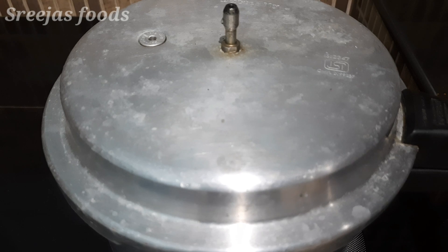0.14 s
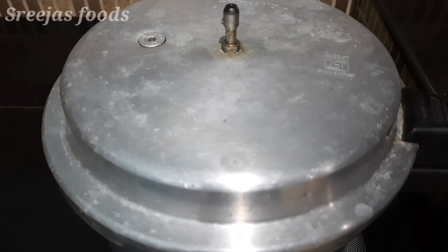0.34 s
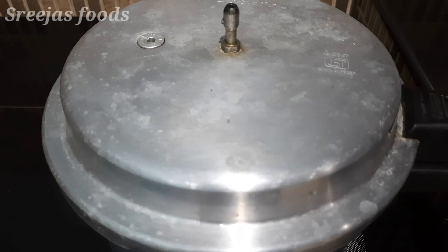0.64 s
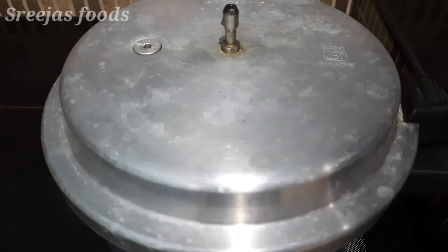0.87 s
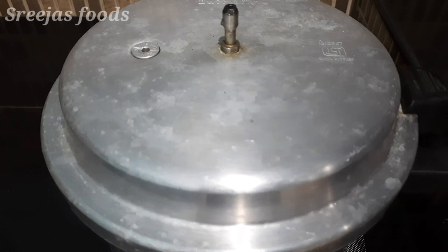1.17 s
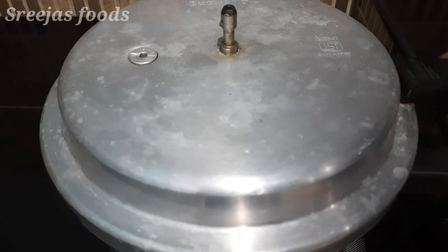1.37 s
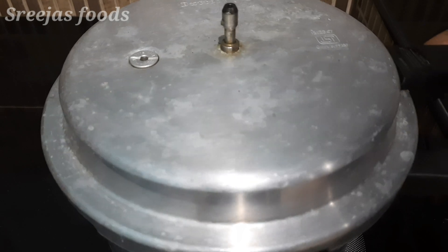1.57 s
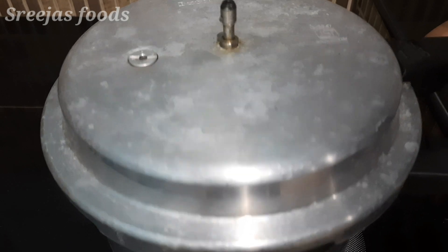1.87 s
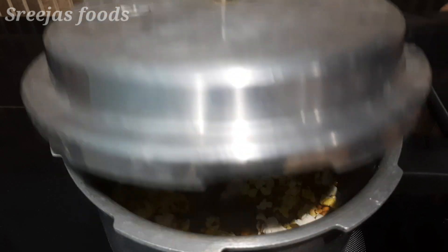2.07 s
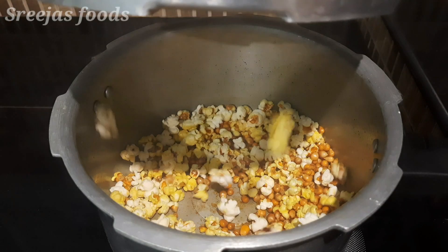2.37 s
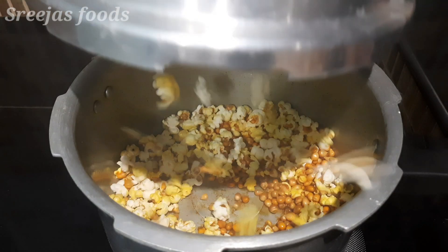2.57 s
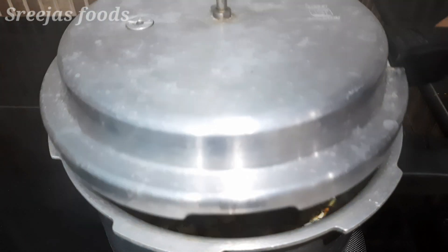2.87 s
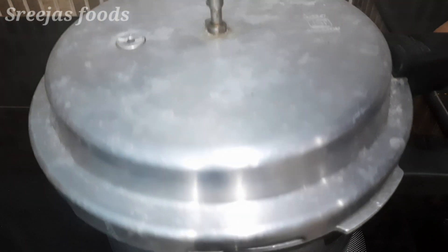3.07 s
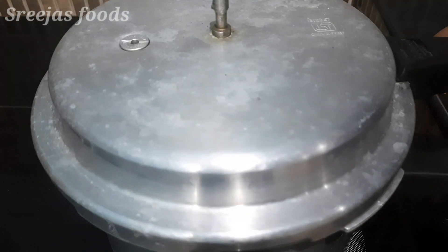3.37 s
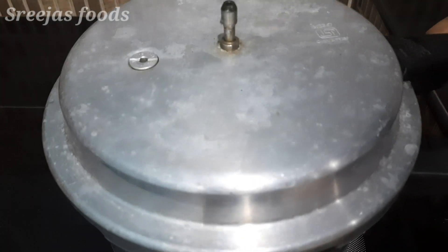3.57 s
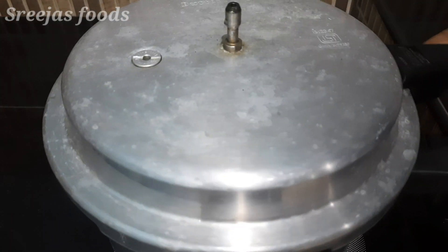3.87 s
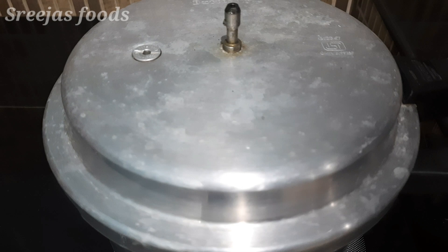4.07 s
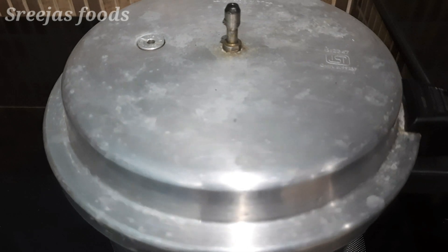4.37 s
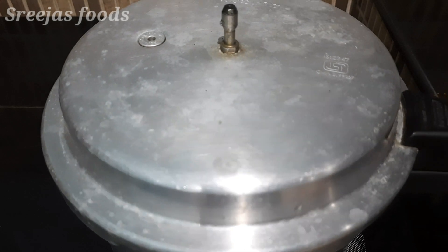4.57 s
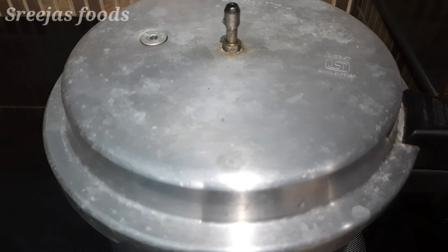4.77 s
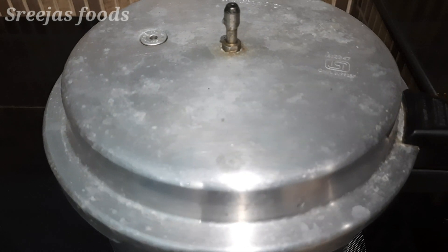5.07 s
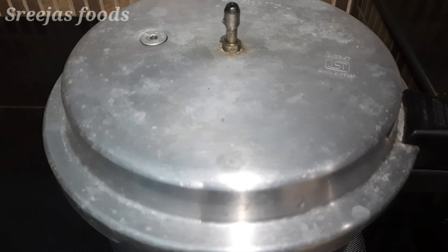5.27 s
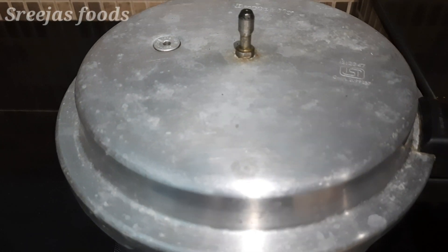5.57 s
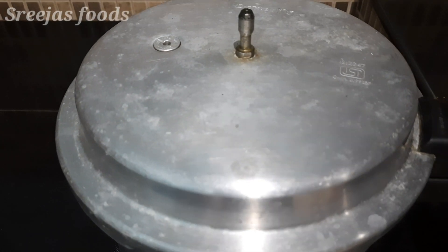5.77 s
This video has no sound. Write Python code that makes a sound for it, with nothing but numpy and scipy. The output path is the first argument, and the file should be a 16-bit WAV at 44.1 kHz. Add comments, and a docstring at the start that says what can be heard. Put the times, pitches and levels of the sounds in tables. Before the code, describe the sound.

Corn kernels pop unevenly inside a lidded aluminium pressure cooker, tapping the metal over a faint oil sizzle and low stove rumble. The lid is lifted and a few pops crack out louder and brighter. It drops back with a clatter of knocks and a heavy thump, then scrapes and clinks as it is turned shut while scattered pops continue. The microphone is close, in a small, hard-walled kitchen.

```python
"""Corn pops in a thick aluminium cooker on a stove; a hand lifts the lid, drops it back and turns it shut.
Each pop or knock is a short noisy blow that drums the lid, cracks in the air and may ring the rim.
The lid drags over its lugs and the vent pipe ticks once; underneath, oil sizzles and the stove rumbles.
Heard in a small, hard kitchen, on a close phone microphone that overloads on the loudest blows.
"""
import sys
import numpy as np
from scipy import signal
from scipy.fft import rfft, irfft
from scipy.io import wavfile

SR = 44100
rng = np.random.default_rng(int(sys.argv[2]) if len(sys.argv) > 2 else 0)


def output_pcm(signal):
    """Save a mono or channel-first signal as 16-bit PCM at the path in sys.argv[1].

    Samples are clipped to [-1, 1] before scaling.
    """
    pcm = np.clip(np.atleast_2d(signal).T, -1, 1) * 32767
    wavfile.write(sys.argv[1], SR, np.round(pcm).astype(np.int16))


N = 261264

# heavy blows that jolt pot and stove: (time [s], thud [dB], stove shake [dB])
JOLTS = [(0.139, -63, -62), (1.29, -71, -70), (1.581, -49, -49.5), (2.021, -33.5, -64.5),
         (2.195, -30.5, -47.5), (2.558, -23.5, -42.5), (2.998, -26, -39.5), (3.2111, -15, -47),
         (3.256, -17, -42), (3.305, -12, -53.5), (3.4417, -31.5, -64), (3.5555, -24.5, -60),
         (3.642, -19, -34.5), (3.6666, -2.1, -38), (3.861, -28.5, -58), (4.0783, -43, -38.5),
         (4.618, -35, -53), (4.862, -55, -53), (5.303, -52, -55)]
LID_LIFTS_S, LID_LANDS_S = 2.15, 3.02
TIME = np.arange(N) / SR


def from_db(db):
    return 10 ** (np.asarray(db) / 20)


def rms_one(x):
    return x / np.sqrt(np.mean(x ** 2) + 1e-20)


def at_hz(points, hz):
    point_hz, values = np.transpose(points)
    return np.interp(np.log(hz), np.log(point_hz), values)


def band(x, low_hz, high_hz):
    return signal.sosfilt(signal.butter(4, [low_hz, high_hz], "band", fs=SR, output="sos"), x + 1e-18)


def coloured(x, spectrum):
    """Filters x by a curve of (frequency [Hz], gain [dB])."""
    hz = np.maximum(np.fft.rfftfreq(N, 1 / SR), 10)
    return irfft(rfft(x) * from_db(at_hz(spectrum, hz)), N)


def resonance(x, hz, width_hz):
    """One damped mode driven by x."""
    r = np.exp(-np.pi * width_hz / SR)
    gain = (1 - r * r) / 2
    return signal.lfilter([gain, 0, -gain], [1, -2 * r * np.cos(2 * np.pi * hz / SR), r * r], x)


def struck_mode(start_s, hz, db, t60, rise_ms):
    """One decaying sine: returns its start sample and its sound."""
    at = round(start_s * SR)
    t = np.arange(min(round(1.5 * t60 * SR), N - at)) / SR
    return at, from_db(db - 60 * t / t60) * np.minimum(1000 * t / rise_ms, 1) * np.sin(2 * np.pi * hz * t)


def stove(rumble_db=-65, rise_s=0.04, t60=0.35):
    """A steady low rumble; each jolt sets stove and counter shaking, then it dies away."""
    level = from_db(rumble_db)
    for start_s, _, shake_db in JOLTS:
        t = np.maximum(TIME - start_s, 0)
        fall_db = 60 * np.maximum(t - rise_s, 0) / t60
        level = level + from_db(shake_db - fall_db) * np.minimum(t / rise_s, 1)
    return level * rms_one(band(rng.standard_normal(N), 42, 112))


def frying(spits_per_s=5400):
    """Dense tiny oil bursts above; below, a dull low murmur that swells around the knocks."""
    # hiss and murmur swell and sink: (time [s], sizzle [dB], murmur [dB], treble against sizzle [dB])
    levels = [(0, -60, -68, 8), (.2, -51, -61, 6), (.42, -42, -59, -5), (.62, -52.5, -63.5, 10),
              (.86, -50.5, -54, 4.5), (1.36, -60.5, -65.5, 15), (1.44, -58.5, -51, 5.5),
              (1.56, -60.5, -62, -1), (1.64, -47.5, -44.5, -2), (1.9, -41, -55, -11),
              (2.16, -61.5, -66, 10.5), (2.54, -56, -72, 8), (2.74, -32, -56, 0), (2.97, -49.5, -60.5, 3),
              (3.2, -38, -30, 2), (3.75, -47, -41.5, 1), (4.02, -54, -57, -13), (4.29, -54, -45.5, 2),
              (4.58, -59.5, -55.5, 3.5), (4.92, -54, -52.5, 6), (5.28, -65, -71, 12),
              (5.4, -59.5, -68, 7.5), (5.68, -58.5, -61, 20), (5.92, -53.5, -57.5, 4.5)]
    # spectra of the oil's hiss and the pot's murmur: (frequency [Hz], level [dB])
    sizzle_spectrum = [(880, -45), (1500, -4), (1930, -16), (2170, -3), (3000, -8), (3250, -1), (4940, 5),
                       (5400, -2), (6310, -6), (7380, -8.5), (9330, -7), (10600, -22), (15500, -40.5)]
    murmur_spectrum = [(90, -47), (130, -14), (180, -7), (260, -13), (380, -10), (520, -5), (760, -4.5),
                       (1000, -18.5), (1900, -25.5), (2500, -29), (3500, -59)]
    times, *levels_db = np.transpose(levels)
    sizzle_gain, murmur_gain, treble_gain = [from_db(np.interp(TIME, times, db)) for db in levels_db]
    bursting = rng.random(N) < spits_per_s / SR
    spits = bursting * from_db(0.44 * rng.exponential(1, N)) * rng.choice([-1, 1], N)
    oil = rms_one(coloured(spits, sizzle_spectrum))
    sizzle = band(oil, 720, 6300) + treble_gain * band(oil, 6480, 12000)
    murmur = rms_one(coloured(rng.standard_normal(N), murmur_spectrum))
    return sizzle_gain * sizzle + murmur_gain * murmur


def kitchen(x, first_echo_s=0.0037):
    """Diffuse echoes off near, hard walls: octave bands of noise, each dying at its own rate."""
    # the room's decay: (frequency [Hz], t60 [s])
    decay = [(100, 0.28), (260, 0.29), (700, 0.47), (1840, 0.47), (4850, 0.34), (12800, 0.41)]
    t = np.arange(round(0.8 * SR)) / SR
    white, tail = rng.standard_normal(len(t)), 0
    for low in 64.0 * 2 ** np.arange(8):
        tail = tail + band(white, low, 2 * low) * from_db(-60 * t / at_hz(decay, low * np.sqrt(2)))
    tail *= np.clip(t / first_echo_s - 1, 0, 1)
    return signal.fftconvolve(x, tail / np.sqrt(np.sum(tail ** 2)))[:N]


def vent_tick(start_s=5.619, level_db=-28, longest_t60=0.07):
    """The small brass pipe clicks and rings briefly, close and dry."""
    # pipe modes: (frequency [Hz], relative level [dB], t60 before the cap [s])
    modes = [(3400, 6.5, 0.045), (4500, 8, 0.073), (5240, 15.5, 0.022), (6020, 4, 0.041), (7000, 3, 0.084),
             (7740, -18, 0.077), (9070, -5, .04)]
    out = np.zeros(N)
    for hz, mode_db, t60 in modes:
        at, tone = struck_mode(start_s, hz, level_db + mode_db, min(t60, longest_t60), rise_ms=0.6)
        out[at:at + len(tone)] += tone
    t = np.arange(SR // 10) / SR
    click = from_db(-16.5 - 60 * t / 0.049) * band(rng.standard_normal(len(t)), 2300, 10000)
    out[at:at + len(t)] += click
    return band(out, 1400, 13500)


def lid_drag(slips_per_s=990, swell_db=8.5, fall_db_per_s=220.5):
    """The lid drags over the lugs and corn tumbles inside: uneven soft slips and bumps."""
    # strokes: (start [s], swell [s], hold [s], relative level [dB], rasp against that level [dB])
    strokes = [(1.584, .02, 0.016, -42, -22), (1.938, .008, 0.075, -30.5, -6),
               (2.166, 0.016, 0.0046, -31.5, -13), (3.547, 0.058, 0.087, -11.5, -10),
               (3.832, 0.014, 0.018, -33, -12), (4.641, 0.013, 0.055, -16, -16.5),
               (5.034, 0.0067, 0.013, -26, -16), (5.312, 0.0082, 0.039, -43, 15.5)]
    sizes = from_db(2.5 * np.minimum(rng.exponential(1, N), 4))
    slips = (rng.random(N) < slips_per_s / SR) * sizes * rng.choice([-1, 1], N)
    dull, rasp = rms_one(band(slips, 250, 1390)), rms_one(band(slips, 1100, 3200))
    out = np.zeros(N)
    for start_s, swell_s, hold_s, level_db, rasp_db in strokes:
        t = TIME - start_s
        rise_db = -swell_db * np.clip(1 - t / swell_s, 0, 1)
        fall_db = fall_db_per_s * np.maximum(t - swell_s - hold_s, 0)
        envelope = np.clip(t / 0.0091, 0, 1) * from_db(level_db + rise_db - fall_db)
        out += envelope * (dull + from_db(rasp_db) * rasp)
    return from_db(-14.5) * out


def rim(waver_db=5, wavers_per_s=70, steady_s=0.086):
    """Hard blows wake the rim's upper modes; a touching lid damps them, loose contact makes them waver."""
    # strikes: (time [s], level [dB], hardness [dB/octave], offset of the two lowest modes [dB],
    # share of free ring time [ratio], rise [ms])
    strikes = [(1.756, -14, -3.5, -0.5, 0.78, 0.61), (2.249, -24, -13, 7.5, 0.19, 0.74),
               (2.292, -26, -15, 15, 0.2, 0.37), (3.371, -17, -15, 2, 0.29, 1.1),
               (4.817, -32.5, 5.5, -12, 0.14, 0.42), (4.860, -12.5, -33, 6.5, 0.54, 0.55),
               (4.895, -17, -17, -24, 0.38, 1.3), (5.559, -36, -9, 16.5, 0.63, 6),
               (5.701, -40.5, -5, 1, 0.54, 1), (5.745, -35, -19, -21, 0.37, 0.83)]
    # rim modes, some in close pairs that beat: (frequency [Hz]), (relative level [dB]), (free t60 [s])
    modes_hz = [2159, 2234, 2336, 2568, 3146, 3160, 4323, 4345, 4549, 4926, 5690, 5703, 6654, 7176, 8403,
                8856, 8963, 10660, 1440]
    modes_db = [-2, -4, -5, -7, -1, -2, -4, -6, -12, -10, -3, 1, -14, -5, -20, -11, -15, -14, -5]
    modes_t60 = [.22, .33, .33, .29, .3, .3, .36, .33, .3, .3, .4, .4, .2, .33, .2, .33, .3, .24, .2]
    octaves = np.log2(np.array(modes_hz) / modes_hz[4])
    wavers = waver_db * rng.standard_normal((len(modes_hz), 1000))
    out = np.zeros(N)
    for start_s, strike_db, hardness, lowest_db, ring_share, rise_ms in strikes:
        tilt_db = hardness * np.where(octaves < 0, 1, octaves)   # the low cluster counts as one octave up
        tilt_db[[0, -1]] = lowest_db
        for hz, db, t60, waver in zip(modes_hz, strike_db + tilt_db + modes_db, modes_t60, wavers):
            at, tone = struck_mode(start_s, hz, db, t60 * ring_share, rise_ms)
            span = slice(at, at + len(tone))
            depth = np.minimum(np.arange(len(tone)) / (steady_s * SR), 1)   # the waver fades in
            wander_db = np.interp(TIME[span] * wavers_per_s, np.arange(len(waver)), waver)
            out[span] += tone * from_db(depth * wander_db)
    return band(out, 2060, 15000)


def pot_body(shaking, modes_db=2, hollow_db=6):
    """Lid and walls resonate to whatever shakes them; the air in the pot sounds while the lid is off."""
    # modes of lid and pot: (frequency [Hz], width [Hz], relative level [dB])
    modes = [(185, 38, -5.5), (248, 22, -1), (365, 80, -1), (493.5, 43, 3), (654, 28, 4), (742, 38, 3),
             (821, 40, 1), (1352, 86, -5), (1700, 29, -7), (2375, 540, -1), (3260, 110, -6),
             (4130, 780, 0.5), (4910, 45, -1), (5590, 67, -47), (6130, 48, -28), (8450, 1200, -17.5)]
    metal = sum(from_db(db) * resonance(shaking, hz, width_hz) for hz, width_hz, db in modes)
    uncovered = (TIME > LID_LIFTS_S) & (TIME < LID_LANDS_S - 0.05)   # covered just before the lid lands
    hollow = resonance(shaking * uncovered + 1e-18, hz=391, width_hz=61)
    return shaking + from_db(modes_db) * metal + from_db(hollow_db) * hollow


def blow_layer(hits, band_hz, stretch, tone_db=0, modes_hz=(), rise_ms=0.96):
    """One band of the blows: noise bursts with any struck tones; stretch scales their rise and decay."""
    t = np.arange(SR // 4) / SR
    bursts, noise = np.zeros(N + len(t)), rng.standard_normal(N + len(t))
    tones = from_db(tone_db) * sum(np.sin(2 * np.pi * hz * t) for hz in modes_hz)
    rise = np.minimum(1000 * t / (stretch * rise_ms), 1)
    for start_s, level_db, decay_ms, drum_hz in hits:
        at = round(start_s * SR)
        envelope = rise * from_db(level_db - 20 * 1000 * t / (stretch * decay_ms))
        shake = noise[at:at + len(t)] + tones
        if drum_hz:   # the lid drums with a rough tone, and its noise thins out below that pitch
            rough_tone = from_db(tone_db) * rms_one(resonance(shake, drum_hz, 0.078 * drum_hz))
            low_cut = signal.butter(2, 0.53 * drum_hz, "high", fs=SR)
            burst = signal.lfilter(*low_cut, envelope * (shake + rough_tone) + 1e-18)
        else:
            burst = envelope * shake
        bursts[at:at + len(t)] += burst
    low, high = band_hz
    return band(bursts[:N], low, high) * np.sqrt(SR / 2 / (high - low))


def pops_and_knocks(jolt_ms=16.6, thud_modes_hz=(251, 182.3)):
    """Bursting corn and lid knocks are short blows in six bands; where each lands sets its drum pitch."""
    # blows, levels relative: (time [s], crack [dB], knock [dB], lid drum [dB], drum pitch [Hz],
    # 20 dB decay before stretch [ms])
    blows = [(0.2221, -21.5, -33, -26.5, 920, 25.5), (.2731, -5.5, -18, -33.5, 659, 18.5),
             (0.4481, -25, -35.5, -51, 805, 19.5), (.5127, -40, -60, -53, 860, 16),
             (.5625, -36, -47, -48, 805, 17), (.7495, -35, -56, -46, 807, 53),
             (.8174, -34.5, -48.5, -46.5, 885, 49), (1.098, -34.5, -63, -56, 611, 9),
             (1.291, -51, -43, -30.5, 502.4, 36), (1.4647, -48, -63, -38.5, 763, 10),
             (1.5824, -37, -39.5, -36, 510, 48), (1.7042, -33, -50, -66.5, 460, 9.7),
             (1.7563, -17.5, -27.5, -22, 867, 29), (1.9883, -44, -31.5, -19, 937, 16.6),
             (2.0211, -35, -27.5, -25.5, 712, 13), (2.1957, -7.5, -19, -18.5, 388, 10.2),
             (2.2457, -25, -24, -34, 388, 18), (2.2906, -20, -16.5, -38, 848, 6.5),
             (2.331, -19, -30.5, -33, 423, 14.2), (2.452, -31.5, -40, -43.5, 470, 17.4),
             (2.5589, 1.5, -9.5, -15.5, 440, 12.8), (2.6119, 1, -8, -12, 488, 11),
             (2.6339, -5.5, -11.5, -26.5, 446, 7.1), (2.6653, -2.5, -17, -16, 583, 17.4),
             (2.7086, -8, -14.5, -34, 940, 8), (2.8773, -28, -32, -55, 487, 4.7),
             (2.9565, -32, -39.5, -59, 387, 22), (2.9966, -3, -12, -6, 613, 21),
             (3.0923, -28, -29.5, -24, 783, 64), (3.204, -20.5, -31, -15, 430, 28),
             (3.2124, -6.5, -12, -14, 860, 20.4), (3.2319, -13, -13.5, -10, 858, 13),
             (3.258, -10, -12.5, -33, 340, 11.7), (3.3033, -5.5, -22.5, -17, 369, 16.6),
             (3.351, -7.5, -10, -37.5, 870, 5.7), (3.3749, -11, -15, -26.5, 864, 17),
             (3.4404, -21.5, -27.5, -25.5, 495, 16), (3.482, -23.5, -25.5, -44.5, 821, 18),
             (3.5535, -29.5, -44, -23.5, 600, 18), (3.6428, -24.5, -16, -15, 449, 20),
             (3.6675, -22.5, -24.5, -20.5, 336, 20), (3.7441, -39, -24.5, -16, 693, 10.3),
             (3.8601, -27.5, -25.5, -15, 533, 11), (4.0587, -39.5, -46, -32, 674, 62),
             (4.0785, -32.5, -36, -19.5, 853, 16.3), (4.3146, -39, -52, -41.5, 754, 15),
             (4.6189, -28, -28.5, -12, 663, 18.5), (4.813, -24, -24, -27, 500, 31),
             (4.8426, -21, -36, -26.5, 650, 11.5), (4.8592, -17.5, -17, -26, 893, 20),
             (4.8976, -19.5, -17, -32, 852, 19.6), (4.9329, -21.5, -24, -33, 885, 31),
             (5.0247, -15, -25, -24, 507, 25.4), (5.301, -23.5, -15, -31.5, 796, 10.3),
             (5.3332, -21.5, -45, -34, 910, 10.2), (5.4844, -44, -62, -56, 779, 97),
             (5.7002, -32, -45, -41, 1060, 15), (5.7422, -22, -31.5, -44.5, 526, 13.7),
             (5.7778, -42, -41, -45.5, 802, 8), (5.8529, -31.5, -41, -53, 525, 17)]
    # bands of crack, thud, drum, knock, spit and air: (low edge [Hz], high edge [Hz])
    bands_hz = [(3000, 6500), (155, 330), (330, 1300), (1300, 3000), (6500, 11000), (11000, 15800)]
    # in the same order; low bands swell and die more slowly: (stretch [ratio])
    stretches = [0.89, 1.65, 2.3, 1.84, 1.26, 0.85]
    # struck tone within thud, drum and knock: (level against their noise [dB])
    tones_db = [-21, -16, -22.5]
    # modes that sound together in the knock: (frequency [Hz])
    knock_modes_hz = [1430, 2235, 2395]
    times, crack_db, knock_db, drum_db, drum_hz, decay_ms = np.transpose(blows)
    lid_open = (times > LID_LIFTS_S) & (times < LID_LANDS_S)
    # spit and air grow with the crack's lead over knock and drum; the shut lid muffles both
    sharpness_db = 0.2 * (crack_db - knock_db) + 0.24 * (crack_db - drum_db)
    spit_db = crack_db + sharpness_db + np.where(lid_open, -7.5, -13.5)
    air_db = spit_db + np.where(lid_open, 3, -6.5)
    thud_db = drum_db - 22.5 - 7 * np.log2(drum_hz / drum_hz.mean())   # a higher drum carries less thud

    def hits(levels_db, pitch_hz=0):
        return list(np.broadcast(times, levels_db, decay_ms, pitch_hz))

    jolts = [(start_s, db, jolt_ms, 0) for start_s, db, _ in JOLTS]
    crack, thud, drum, knock, spit, air = zip(bands_hz, stretches)
    out = blow_layer(hits(crack_db), *crack)
    out += blow_layer(hits(thud_db) + jolts, *thud, tones_db[0], thud_modes_hz)
    out += blow_layer(hits(drum_db, drum_hz), *drum, tones_db[1])
    out += blow_layer(hits(knock_db), *knock, tones_db[2], knock_modes_hz)
    out += blow_layer(hits(spit_db), *spit)
    out += blow_layer(hits(air_db), *air)
    return from_db(-7) * out


def scene():
    """The cooker from close by, in mono, with the kitchen's echoes behind it."""
    pot = pot_body(pops_and_knocks() + lid_drag())
    ringing = rim()
    echoes = from_db(-5) * kitchen(pot + from_db(-7) * ringing)
    return (pot + ringing + vent_tick() + echoes + frying() + stove())[None]


def record(dry, hiss_db=-77, cutoff_hz=16400):
    """The close phone microphone dulls the treble, hisses faintly, clips on peaks and cuts the top."""
    # microphone response: (frequency [Hz], gain [dB])
    response = [(100, -1.5), (200, -1), (9800, -2.5), (11000, -9.5), (13000, -20.5), (15500, -22.5)]
    heard = coloured(dry, response) + from_db(hiss_db) * rng.standard_normal(dry.shape)
    high_cut = signal.cheby2(12, 70, cutoff_hz, fs=SR, output="sos")
    return signal.sosfilt(high_cut, np.clip(heard, -1, 1))


dry = scene()
out = record(dry)
output_pcm(out)
```